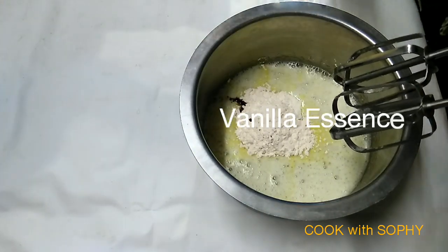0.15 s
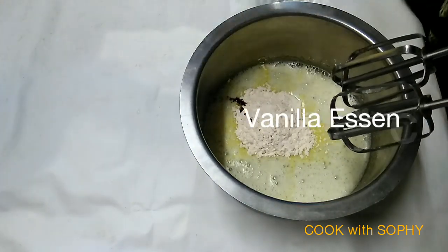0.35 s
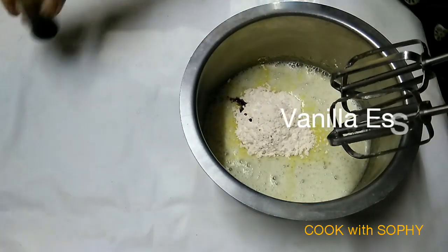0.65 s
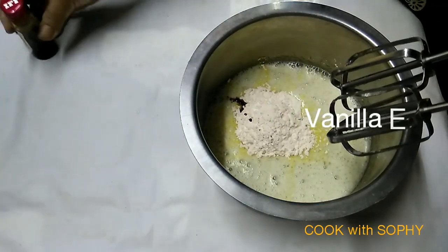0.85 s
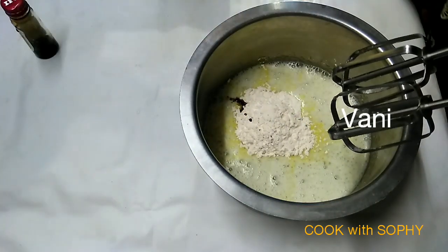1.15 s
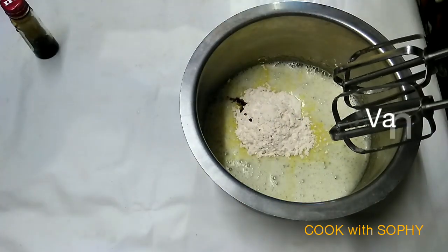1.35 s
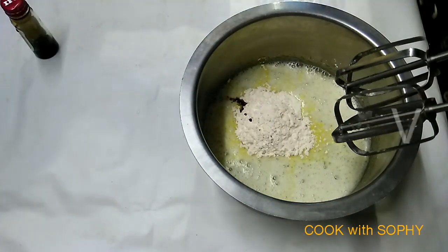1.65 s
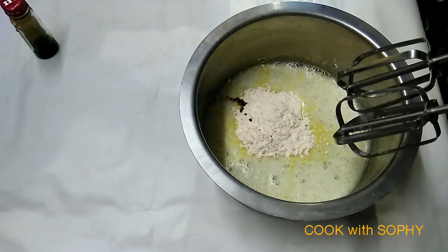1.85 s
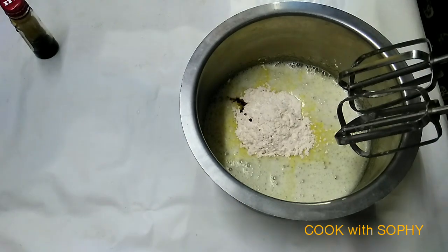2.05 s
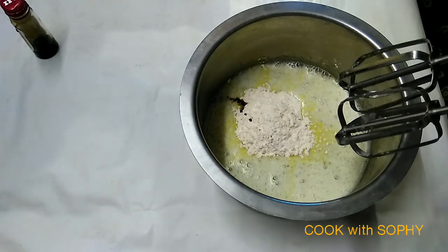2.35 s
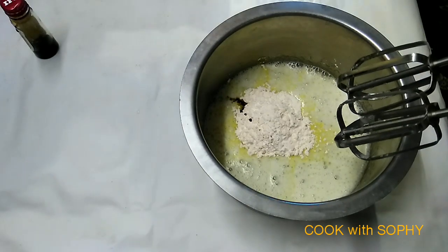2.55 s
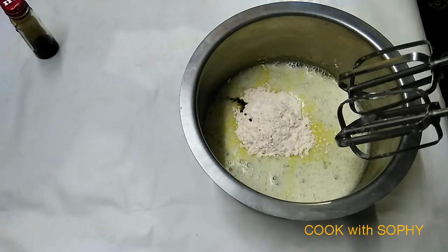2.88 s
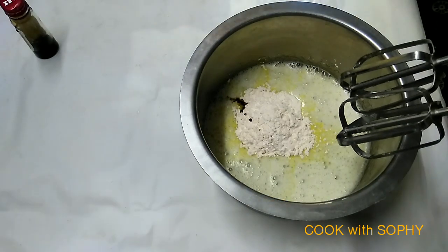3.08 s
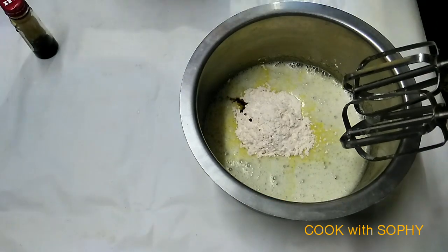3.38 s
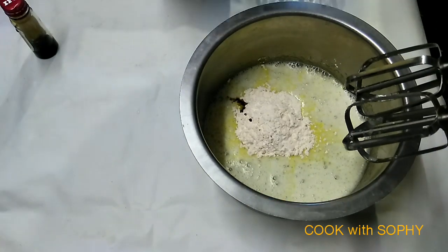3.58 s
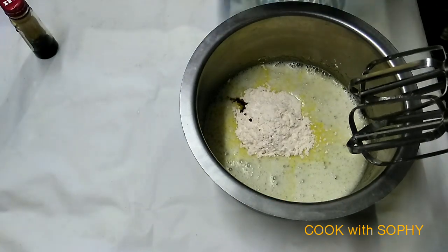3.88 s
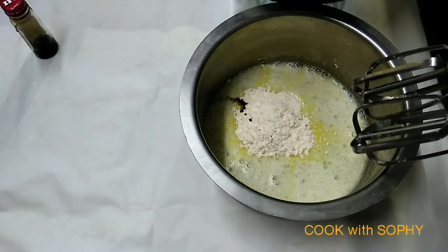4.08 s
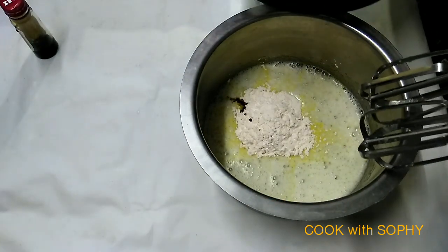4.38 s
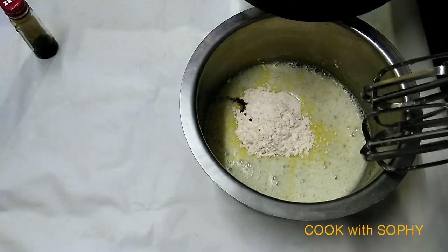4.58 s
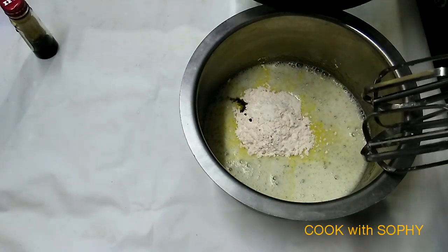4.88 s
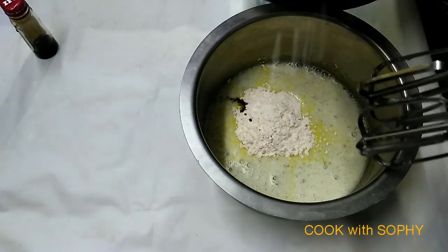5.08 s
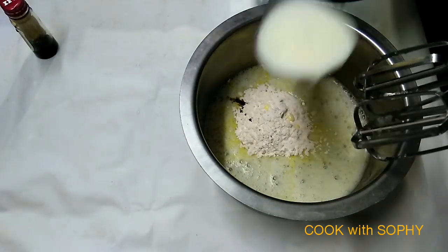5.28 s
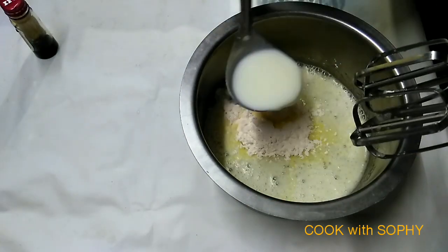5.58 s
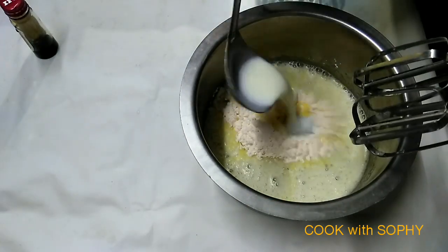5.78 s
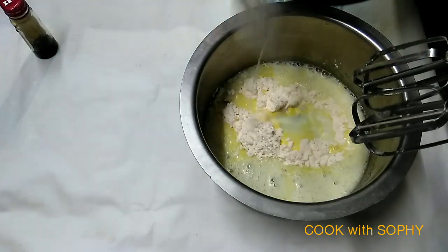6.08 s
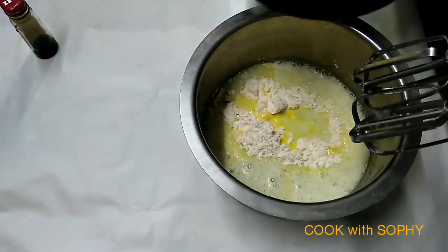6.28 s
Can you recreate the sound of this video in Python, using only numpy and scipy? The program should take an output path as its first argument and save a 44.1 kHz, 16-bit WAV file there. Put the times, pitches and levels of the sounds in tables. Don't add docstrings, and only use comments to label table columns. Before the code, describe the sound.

In a quiet home kitchen, a small bottle knocks and clicks on the counter, followed by faint ticks, soft sliding and foil-like crinkles. A dull knock precedes a quick stutter of metal pot knocks with a rattling base. A ladle then clangs on a pan rim and is quickly stilled. Tiny milk drips, a light metal tap and crisp ticks finish. A close phone microphone catches hiss and low fridge hum.

```python
import sys
import numpy as np
from scipy import signal
from scipy.fft import rfft, irfft, next_fast_len
from scipy.io import wavfile
from scipy.ndimage import uniform_filter1d

SR = 44100
rng = np.random.default_rng(int(sys.argv[2]) if len(sys.argv) > 2 else 0)


def materialize(psi):
    bounded = np.clip(np.atleast_2d(psi).T, -1, 1)
    quanta = np.round(bounded * 32767).astype(np.int16)
    wavfile.write(sys.argv[1], SR, quanta)


def ratio_of_db(decibels):
    return 10 ** (np.asarray(decibels, float) / 20)


N = 284116
TIME = np.arange(N) / SR
STEP = 147


def read(table, hz):
    table_hz, value = np.transpose(table)
    return np.interp(np.log(np.maximum(hz, 1)), np.log(table_hz), value)


def colour(x, table):
    size = x.shape[-1]
    hz = np.arange(size // 2 + 1) * SR / size
    return irfft(rfft(x) * ratio_of_db(read(table, hz)), size)


def unit(x):
    return x / np.sqrt(np.mean(x ** 2))


def band(x, lo_hz, hi_hz, order=2):
    return signal.sosfilt(signal.butter(order, [lo_hz, hi_hz], "band", fs=SR, output="sos"), x)


# hz, likeness
ALIKE = [(30, 0), (130, 0.73), (500, 0.33), (1400, 0.14), (4000, 0)]


def pair(size):
    mid, side = rfft(rng.standard_normal((2, size)))
    like = np.clip(read(ALIKE, np.arange(len(mid)) * SR / size), 0, 1)
    sign = np.array([[1], [-1]])
    return irfft(np.sqrt(1 + like) * mid + np.sqrt(1 - like) * side * sign, size)


def long_pair():
    return pair(next_fast_len(N))[:, :N]


def walk(rate_hz):
    hold = int(SR / rate_hz)
    steps = np.repeat(rng.standard_normal(N // hold + 1), hold)
    return 0.91 * uniform_filter1d(uniform_filter1d(steps, hold), hold)[:N]


def fade(t, t60_s):
    return np.exp(-np.log(1000) * t / np.maximum(t60_s, .002))


def add(out, start_s, peak_db, sound, pan_db=0):
    i = max(int(start_s * SR), 0)
    gain = ratio_of_db(peak_db + np.array([[pan_db], [-pan_db]]) / 2)
    part = sound[:, :N - i] * gain / np.abs(sound).max()
    out[:, i:i + part.shape[1]] += part


# hz, pan_db
PORTS = [(390, -2.5), (650, -2.5), (2000, -1.5), (4000, -2), (9000, 9)]


def vessel(modes, blows, crack, crack_t60_s, longest_t60_s, lean_db, damp=1):
    waver, rock_hz, build_cycles = .15, 18, 3.0
    out, t = np.zeros((2, N)), np.arange(16384) / SR
    hz, db, t60_s = (column[:, None] for column in np.transpose(modes))
    for start_s, peak_db, contact_s, bright_db, crack_db in blows:
        chance = rng.standard_normal((3, len(modes), 1))
        mode_db = db + bright_db * np.log2(hz / 1500) + lean_db * chance[0]
        ring = ratio_of_db(mode_db) * fade(t, np.minimum(t60_s, longest_t60_s) / damp)
        rock = np.sin(2 * np.pi * (rock_hz * (1 + 0.24 * chance[1]) * t + chance[0]))
        ring = ring * (1 + waver * rock) * (1 - np.exp(-t * hz / build_cycles))
        lag = np.minimum(hz / 1200, 1) * 1.5 * np.sign(chance[1])
        rings = []
        for side in (.5, -.5):
            tones = np.sin(2 * np.pi * hz * t + 3 * chance[2] + side * lag)
            rings.append((ring * ratio_of_db(side * read(PORTS, hz)) * tones).sum(axis=0))
        rings = np.array(rings)
        noise = unit(colour(pair(len(t)), crack)) * fade(t, crack_t60_s / damp)
        rise = np.sin(np.pi / 2 * np.minimum(t / max(contact_s, .0005), 1)) ** 2
        hit = rise * (rings / np.abs(rings).max() + ratio_of_db(crack_db - 6) * noise)
        add(out, start_s - .001, peak_db, hit)
    return out


def mute(x, stop_s):
    return x * ratio_of_db(-350 * np.maximum(TIME - stop_s, 0))


# hz, db, t60_s
LADLE_MODES = [(1336, -9, .1), (1882, -11, .05), (2373, -9, .035), (3050, -15, .035), (4135, -8, .08),
               (4412, 1, .1), (4755, -1, .1), (5310, -14, .06), (6292, -5, .06), (6470, -7, .07),
               (6770, -11, .07), (7570, -4, .04), (8230, -8, .03), (9500, -12, .025)]
# hz, db, t60_s
PAN_MODES = [(393, -14.5, .5), (824, -27, .3), (1336, -23.5, .5), (1811, -4, .08), (1891, -8, .06),
             (2300, -7, .06), (2967, -8.5, .08), (2998, -10, .07), (3811, -14, .1), (4755, -18, .12),
             (5711, -12.5, .1), (6390, -11, .1), (7450, -15, .09), (7995, -11, .08)]
# hz, db_per_hz
PAN_CRACK = [(88, -84), (150, -32), (388, -12.5), (668, -15), (812, -16.5), (1830, -10.5), (2700, -14.5),
             (4840, -13), (9180, -9.5), (11500, -26), (15500, -40)]
# start_s, peak_db, contact_s, bright_db_per_oct, crack_db
LADLE_BLOWS = [
    (4.2128, -12, .002, 0, -5),
]
PAN_BLOWS = [
    (4.2255, -12, .004, 0, -6),
]
PAN_TAPS = [
    (5.633, -28, 0.0033, 0.88, -0.5),
]


def ladle_on_pan():
    ladle = vessel(LADLE_MODES, LADLE_BLOWS, PAN_CRACK, crack_t60_s=.1, longest_t60_s=.12, lean_db=.5)
    pan = vessel(PAN_MODES, PAN_BLOWS, PAN_CRACK, crack_t60_s=0.22, longest_t60_s=.5, lean_db=.5)
    taps = vessel(PAN_MODES, PAN_TAPS, PAN_CRACK, crack_t60_s=0.25, longest_t60_s=0.45, lean_db=4.0, damp=1.97)
    return ladle + mute(pan, 4.375) + taps


def ticks(rows, width, snap_lo_hz, snap_hi_hz, snap_t60_s, snap_db, longer_db=0, higher_db=0):
    out, t = np.zeros((2, N)), np.arange(16384) / SR
    for start_s, peak_db, hz, t60_s, pan_db in rows:
        shared, own = rng.standard_normal(len(t)), rng.standard_normal((2, len(t)))
        noise = shared + 0.7 * own
        ring = unit(band(noise, hz / (1 + width), hz * (1 + width))) * fade(t, t60_s)
        snap = unit(band(noise, snap_lo_hz, snap_hi_hz)) * fade(t, snap_t60_s)
        hard_db = snap_db + longer_db * min(np.log2(t60_s / 0.06), 0) + higher_db * np.log2(hz / 1000)
        hit = (ring + ratio_of_db(hard_db) * snap) * np.minimum(t / 0.00066, 1)
        add(out, start_s - .0005, peak_db, hit, pan_db)
    return out


# hz, db, t60_s
POT_MODES = [(645, -8, 0.24), (672, -6, 0.26), (694, -10, 0.22), (889, -12, .15), (1235, -9, 0.16),
             (1299, -12, 0.16), (1337, -9, 0.18), (1458, -7, 0.11), (1630, -8, 0.093), (2100, 0, 0.055),
             (2160, -31, 0.45), (3015, -15, .07), (7800, -10.5, 0.044), (9000, -13.5, 0.033)]
# hz, db_per_hz
COUNTER_CRACK = [(88, -70), (150, -74), (225, -18.5), (471, -30), (656, -5), (1090, -15), (1270, -10),
                 (1730, -15.5), (2100, -13.5), (7410, -23), (15500, -37)]
# start_s, peak_db, contact_s, bright_db_per_oct, crack_db
POT_BLOWS = [
    (3.125, -40, 0.013, 3, -23),
    (3.174, -28, 0.011, -4, -8),
    (3.184, -19.5, .004, 1, -5.5),
    (3.195, -16.5, 0.0028, 3, -3),
    (3.208, -27.5, 0.006, -0.5, -9),
    (3.216, -26.5, 0.0036, 0, -7),
    (3.228, -29, 0.0033, -3, 0),
    (3.253, -29, 0.0028, 1.5, -4.5),
    (3.264, -29, 0.003, -5, -3),
]
# start_s, peak_db, pitch_hz, t60_s, pan_db
RATTLES = [
    (3.177, -39, 660, .1, -2),
    (3.212, -27.5, 660, .09, 1),
    (3.238, -31, 680, .07, 0),
    (3.261, -27.5, 660, .09, -3.5),
    (3.205, -30, 1300, .1, -2),
    (3.305, -37.5, 670, 0.095, -2),
    (3.325, -38, 654, 0.097, -1),
    (3.315, -41.5, 1240, .1, -2),
]


def pot_pulled_up():
    pot = vessel(POT_MODES, POT_BLOWS, COUNTER_CRACK, crack_t60_s=0.23, longest_t60_s=0.56, lean_db=1.0)
    return mute(pot, 3.34) + ticks(RATTLES, .06, 500, 5000, 0.023, snap_db=-12)


# hz, db, t60_s
BOTTLE_MODES = [(507, -8, 0.071), (645, 3.5, 0.053), (1120, -9, 0.036), (1764, -16, 0.064),
                (2660, -14, 0.06), (4070, -6.5, 0.058), (5030, -9, 0.053)]
# start_s, peak_db, contact_s, bright_db_per_oct, crack_db
BOTTLE_BLOWS = [
    (0, -36, 0.0029, -6, -14),
    (0.020, -27.5, 0.0056, 0, -5.5),
    (0.049, -29, 0.00083, -21, 2),
    (0.062, -35, 0.0022, -2, 5),
]


def bottle():
    return vessel(BOTTLE_MODES, BOTTLE_BLOWS, COUNTER_CRACK, crack_t60_s=0.11, longest_t60_s=0.062,
                  lean_db=-0.5, damp=1.32)


# start_s, peak_db, pitch_hz, t60_s, pan_db
LOW_TICKS = [(0.15, -45.5, 1700, 0.0083, 3), (0.392, -43, 1270, 0.035, -1), (1.098, -44, 1870, 0.024, -11),
             (3.075, -42.5, 3800, 0.12, -14), (5.237, -48.5, 1500, 0.033, 4), (5.633, -36, 2100, .05, -2),
             (5.474, -44.5, 1790, 0.0077, -13), (5.741, -29, 1380, 0.0049, 2),
             (5.795, -46.5, 1350, 0.026, -7), (5.888, -42.5, 1500, 0.02, -1),
             (5.94, -42.5, 1270, 0.033, -2), (6.9, -41.5, 3060, 0.036, -5), (0.67, -55, 2600, .02, -2),
             (5.976, -51, 1350, .015, 0), (1.135, -42, 1900, 0.034, -4)]
HIGH_TICKS = [(0.0225, -31.5, 8600, 0.11, 1), (0.048, -37, 4440, 0.05, -1), (0.1503, -46, 4820, 0.033, 5),
              (0.39, -43.5, 4710, 0.12, -1), (0.4496, -39.5, 12600, 0.029, -2), (.4505, -46, 8500, .03, -2),
              (2.584, -45.5, 8600, 0.15, 11), (2.613, -49, 4830, 0.21, -12), (3.075, -49, 7800, 0.22, 11),
              (4.586, -45.5, 9000, 0.13, 2), (4.802, -51.5, 8460, 0.035, -5),
              (5.1617, -56.5, 8300, 0.034, 14), (5.855, -50, 13000, .01, 1), (5.8625, -47, 8750, 0.015, -4),
              (5.8821, -33.5, 4850, 0.016, -14.5), (5.9245, -38.5, 8500, 0.013, 7),
              (5.94, -51, 9500, .012, 0), (5.982, -45, 11800, 0.012, 5), (6.012, -50, 5500, .015, -4),
              (6.0207, -35.5, 9400, 0.016, 0), (6.125, -31, 8860, 0.0081, 3)]


def cap_and_glass():
    low = ticks(LOW_TICKS, 0.14, 290, 6400, 0.02, snap_db=9.0, longer_db=10.0)
    return low + ticks(HIGH_TICKS, 0.071, 4500, 9700, 0.0093, snap_db=5.5, longer_db=7.5)


# start_s, peak_db, pitch_hz, t60_s, pan_db
THUDS = [
    (0.15, -37.5, 453, 0.041, 1),
    (1.1, -50.5, 1040, 0.41, -11),
    (1.131, -41, 384, 0.2, 4.5),
    (1.29, -53.5, 630, 0.2, -4),
    (2.879, -32, 860, 0.21, -4),
    (3.735, -55.5, 980, 0.87, -11),
    (5.292, -53, 990, 0.28, 4),
    (5.74, -29, 564, 0.031, -3.5),
]
BUMPS = [
    (1.14, -45, 118, 0.48, -3),
    (2.29, -48, 110, 0.52, 3),
    (2.87, -49.5, 119, 0.93, 4),
]


def counter():
    thuds = ticks(THUDS, 1.14, 930, 5900, 0.18, snap_db=-17.0, longer_db=8, higher_db=0.5)
    return thuds + ticks(BUMPS, 0.28, 300, 1500, .1, snap_db=-19)


def tones(rows, rise_oct_per_s):
    out, t = np.zeros((2, N)), np.arange(12000) / SR
    for start_s, peak_db, pitch_hz, t60_s, pan_db in rows:
        hz = pitch_hz * 2 ** np.clip(rise_oct_per_s * t, 0, 1)
        tone = np.sin(2 * np.pi * np.cumsum(hz) / SR + np.array([[0], [.6]]))
        gain = ratio_of_db(4.9 * walk(43)[:len(t)]) * fade(t, t60_s) * np.minimum(t / 0.002, 1)
        add(out, start_s, peak_db, tone * gain, pan_db)
    return out


# start_s, peak_db, pitch_hz, t60_s, pan_db
DROPS = [
    (4.563, -46.5, 1486, 0.084, -8),
    (4.592, -50.5, 1590, 0.023, -5),
    (4.594, -58.5, 3330, 0.036, -2),
    (4.655, -65, 1500, 0.027, -6),
    (4.762, -68, 3080, 0.035, -18),
    (4.772, -63, 5240, 0.022, -13),
    (6.234, -55.5, 3440, 0.012, -11),
]
RINGS = [(0.809, -65, 910, 0.5, 8), (.86, -63.5, 976, 0.33, -4), (1.29, -58, 680, .3, 0),
         (3.75, -62, 810, 0.3, 4), (3.195, -42, 4350, .06, 0), (3.256, -43, 4460, 0.2, 2),
         (3.285, -48, 4460, .12, 2), (3.27, -54, 3850, .15, 0), (4.736, -54, 2180, 0.04, -8),
         (4.755, -50, 1735, .035, -6), (4.815, -57, 1770, 0.09, -8), (4.87, -62, 1764, 0.22, 4)]


def drips_and_rings():
    return tones(DROPS, rise_oct_per_s=5.1) + tones(RINGS, rise_oct_per_s=0)


# start_s, peak_db, pitch_hz, t60_s, pan_db
SCUFFS = [
    (1.24, -55, 3300, 0.31, -17),
    (2.288, -62.5, 3560, 0.32, 11),
    (3.74, -58.5, 3780, 0.87, 2),
    (5.292, -52, 3670, 0.31, 0),
    (6.29, -64.5, 3920, 0.35, -17),
]
CRINKLES = [(.288, -56, 3950, .15, -7), (1.243, -50, 3150, .12, -4), (1.255, -52, 2800, .1, -4),
            (1.291, -50, 4080, .12, 1), (2.376, -54, 9470, .25, 4), (2.38, -58, 6500, .4, 4),
            (2.405, -46.5, 8480, .3, 6), (2.415, -52, 9900, .25, 5), (2.43, -50, 8400, .25, 5),
            (2.455, -51, 8800, .3, 5), (2.48, -54, 7200, .3, 4), (2.5, -51, 9000, .15, 5),
            (2.53, -55, 8000, .3, 4), (2.611, -50, 7800, .4, 3), (2.615, -54, 2700, .2, 0),
            (2.62, -51, 5700, .25, 3), (2.63, -52, 6600, .2, 3), (2.64, -51, 4800, .3, 0),
            (2.665, -51, 7500, .25, 3), (2.668, -54, 9300, .15, 3), (2.745, -59, 4000, .4, 0),
            (5.888, -53, 4750, .08, -8), (5.634, -40, 8800, .09, 2), (5.634, -44, 7300, .09, 2)]


def brushes():
    scuffs = ticks(SCUFFS, .45, 3000, 11000, .02, snap_db=-18) * ratio_of_db(4.5 * walk(120))
    return scuffs + ticks(CRINKLES, .045, 3000, 11000, .01, snap_db=-18) * ratio_of_db(3.0 * walk(400))


# time_s, pressure_db
SLIDE = [(.5, -90), (.6, -70), (.78, -71), (1.0, -84), (1.2, -75), (1.3, -67), (1.44, -63.5), (1.55, -69.5),
         (1.62, -71), (1.67, -65), (1.85, -73), (2.15, -84)]


def slide():
    time_s, db = np.transpose(SLIDE)
    noise = band(long_pair(), 1855, 2690, order=5)
    return unit(noise) * ratio_of_db(np.interp(TIME, time_s, db, left=-120, right=-120) + 2.8 * walk(39.94))


def swell(start_s, hold_s, rise_db_per_s, fall_db_per_s):
    t = TIME[::STEP]
    rise, fall = rise_db_per_s * (t - start_s), fall_db_per_s * (start_s + hold_s - t)
    return np.minimum(np.minimum(rise, fall), 0)


# start_s, hold_s, level_db, centre_hz, off_db_per_oct
CLOTH = [(0, 0.17, -67.5, 3020, -1.5), (0.392, 0.16, -64, 9050, 1), (1.13, 0.02, -60.5, 8900, 3.5),
         (1.25, 0.05, -61.5, 3570, 4.5), (2.32, 0.26, -66.5, 1770, 9.5), (2.406, 0.073, -58.5, 8600, 4),
         (2.62, 0.034, -58, 6400, 2), (2.915, 0.1, -59, 1030, 11.5), (3.088, 0.23, -57, 7400, 3.5),
         (3.172, 0.096, -48, 980, 19), (3.779, 0.06, -60, 1980, 7.5), (4.4, 0.25, -69.5, 10000, 6),
         (4.762, 0.15, -65.5, 2060, 8), (5.268, 0.096, -67, 1800, 5), (5.513, 0.31, -68, 12000, 1.5),
         (5.67, 0.044, -64, 1150, 6), (5.891, 0.045, -65.5, 2060, 2.5), (5.871, 0.22, -60, 9600, 5.5),
         (6.11, 0.21, -66, 2280, 4)]


def cloth():
    shapes = np.array([ratio_of_db(db + swell(s, hold, 242, 102)) for s, hold, db, _, _ in CLOTH])
    centre_hz, off_db = np.transpose(CLOTH)[3:]
    grains = long_pair() * ratio_of_db(3.5 * walk(250) + 3.0 * walk(50))
    out = np.zeros((2, N))
    for hz in 750 * 2 ** np.arange(0, 4.2, 1 / 3):
        level = ratio_of_db(-93.5) + ratio_of_db(-abs(off_db * np.log2(hz / centre_hz))) @ shapes
        patch_db = -3.5 - 3.5 * max(np.log2(hz / 9500), 0) + 2.0 * walk(25)
        rustle = unit(band(grains, hz / 1.097, hz * 1.1035))
        out = out + rustle * np.interp(TIME, TIME[::STEP], level) * ratio_of_db(patch_db)
    return out


# start_s, hold_s, level_db
THUMPS = [
    (0.22, 0.45, -57),
    (1.14, 0.25, -55.5),
    (1.5, 0.2, -60),
    (2.362, 0.28, -52.5),
    (3.016, 0.29, -51.5),
    (3.806, 0.085, -54.5),
    (4.777, 0.12, -58.5),
    (5.353, 0.091, -55.5),
    (5.653, 0.69, -56.5),
]


def body():
    level = ratio_of_db(-72) + sum(ratio_of_db(db + swell(s, hold, 72, 98)) for s, hold, db in THUMPS)
    noise = unit(band(long_pair(), 72.5, 336))
    return noise * np.interp(TIME, TIME[::STEP], level) * ratio_of_db(-4.5 + 1.2 * walk(11))


# multiple, level_db
MOTOR = [(8, -94.5), (9, -84.5), (10, -72), (11, -74.5), (12, -79.5), (42, -88.5), (43, -84), (47, -104)]


def motor():
    turn = 2 * np.pi * np.cumsum(49.2 * (1 + 0.001465 * walk(3.01))) / SR
    sides = []
    for _ in range(2):
        sides.append(sum(ratio_of_db(db + 1.5 + 3.5 * walk(5)) * np.sin(k * turn + k * k) for k, db in MOTOR))
    return np.array(sides)


# first_multiple, last_multiple, step, level_db
WHINE = [(123, 126, 1, -101), (127, 134, 1, -90), (128, 132, 4, -86), (137, 143, 1, -93),
         (145, 147, 1, -96), (149, 150, 1, -100), (156, 160, 2, -99), (186, 194, 2, -101),
         (201, 207, 6, -95)]


def screen():
    refresh_hz = 60
    cycle = np.arange(SR // refresh_hz) * refresh_hz / SR
    whine = sum(ratio_of_db(db + 11.0) * np.sin(2 * np.pi * (k * cycle + k * k / 3.75))
                for first, last, step, db in WHINE for k in range(first, last + 1, step))
    return np.resize(whine, N) * ratio_of_db(0.5 * walk(13.0)) * ratio_of_db(np.array([[0], [-28]]))


# hz, db_per_hz
AIR = [(12, -30), (20, -1), (44, -6.5), (161, 0), (503, -8.5), (1130, -20.5), (2060, -21.5), (3260, -31),
       (4050, -26.5), (5770, -28.5), (6430, -35), (7770, -25.5), (10500, -30.5), (12500, -28), (13100, -37)]


def air():
    size = next_fast_len(N)
    tone, out = rfft(colour(pair(size), AIR)), 0
    octave = np.log2(np.maximum(np.arange(tone.shape[1]) * SR / size, 20) / 20)
    for k in range(11):
        part = irfft(tone * np.maximum(1 - abs(octave - k), 0), size)[:, :N]
        out = out + part * ratio_of_db(1.8 * walk(5))
    return unit(out) * ratio_of_db(-61)


def room(x, wet_db):
    low_t60_s, top_t60_s = 0.45, 0.41
    t = np.arange(SR // 2) / SR
    noise = pair(len(t))
    low = signal.sosfilt(signal.butter(1, 2500, fs=SR, output="sos"), noise)
    tail = low * fade(t, low_t60_s) + (noise - low) * fade(t, top_t60_s)
    tail = tail * np.minimum(t / 0.023, 1)
    tail = tail / np.sqrt((tail ** 2).sum() / 2)
    tail = signal.sosfilt(signal.butter(1, 800, "high", fs=SR, output="sos"), tail)
    return x + ratio_of_db(wet_db) * signal.fftconvolve(tail, x.mean(axis=0)[None])[:, :N]


def scene():
    struck = ladle_on_pan() + pot_pulled_up() + bottle()
    small = cap_and_glass() + counter() + drips_and_rings() + brushes()
    hits = room(struck, wet_db=-13) + room(small, wet_db=-12)
    return hits + slide() + cloth() + body() + motor() + screen() + air()


# hz, margin_db
MASK = [(2000, -30), (3400, -7), (4600, -5.5), (6400, -2), (7500, -11), (9000, -8), (10500, -3),
        (12000, -5), (13500, -1), (15500, 1)]


def blank(x, size=2048, count=10):
    scatter, heard_db, top_hz = 2.5, -112, 15550
    window = np.sin(np.pi * (np.arange(size) + .5) / size)
    hz, _, z = signal.stft(x, SR, window, size, size // 2)
    power = uniform_filter1d((abs(z) ** 2).mean(axis=0), count, axis=0)[count // 2::count]
    db = 10 * np.log10(power + 1e-20)
    scatter_db = scatter * unit(uniform_filter1d(rng.standard_normal(db.shape), size=2, axis=1))
    margin_db = db - uniform_filter1d(db, count, axis=0) + scatter_db
    attack = np.diff(db.mean(axis=0), prepend=0) > 5
    unmasked = margin_db > read(MASK, hz[count // 2::count])[:, None]
    keep = (unmasked | attack) & (db > heard_db)
    keep = keep[np.minimum(np.arange(len(hz)) // count, len(keep) - 1)] & (hz < top_hz)[:, None]
    return signal.istft(z * keep, SR, window, size, size // 2)[1][:, :N]


def roll_off(x):
    return signal.sosfilt(signal.butter(12, 16180, fs=SR, output="sos"), x)


def record(dry):
    heard = signal.sosfilt(signal.butter(3, 14200, fs=SR, output="sos"), dry)
    mix = blank(heard)
    return roll_off(mix)


dry = scene()
out = record(dry)
materialize(out)
```